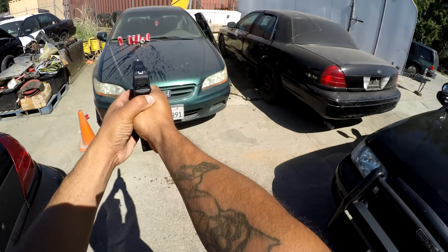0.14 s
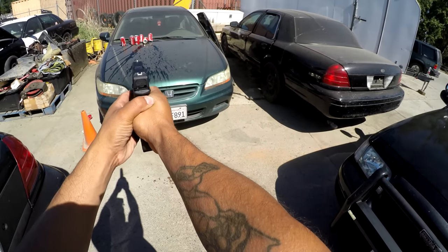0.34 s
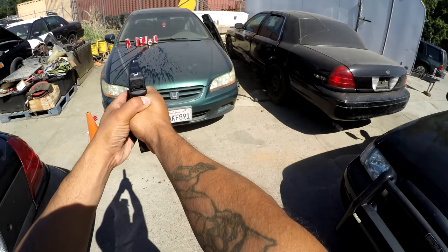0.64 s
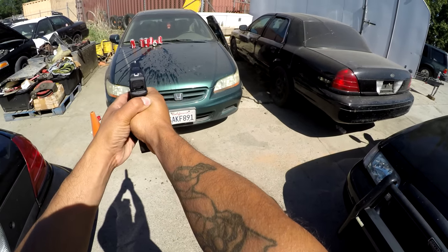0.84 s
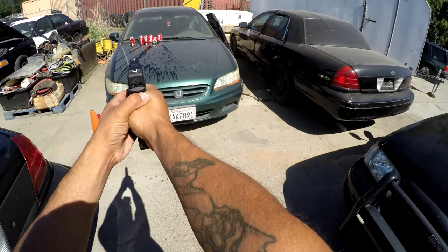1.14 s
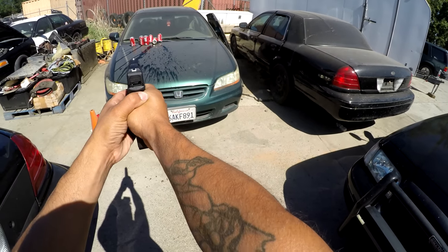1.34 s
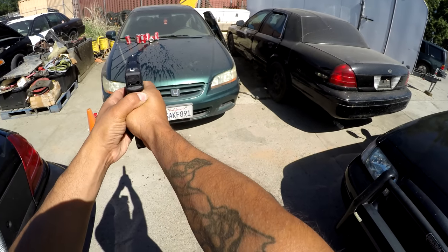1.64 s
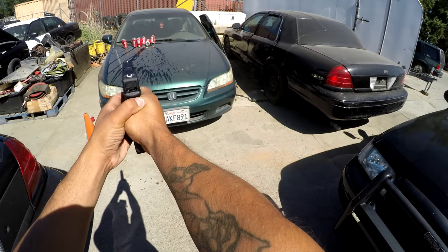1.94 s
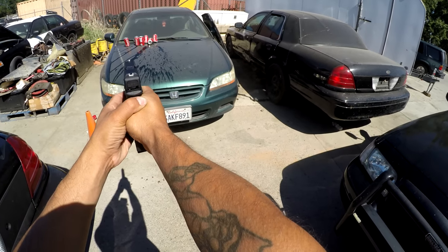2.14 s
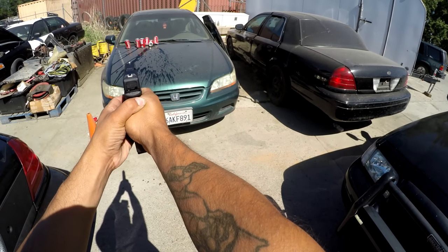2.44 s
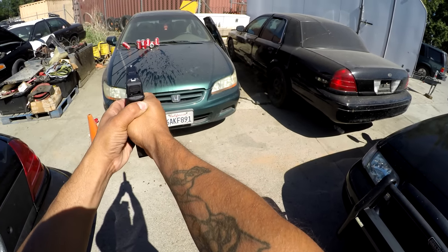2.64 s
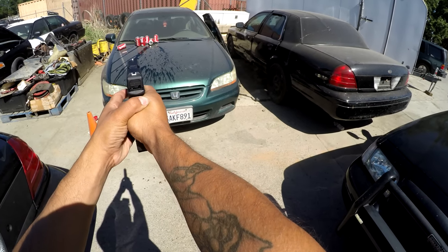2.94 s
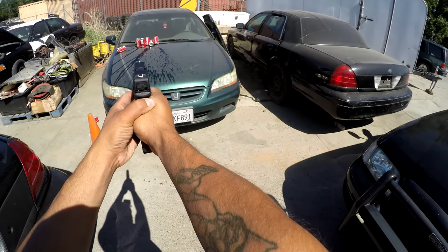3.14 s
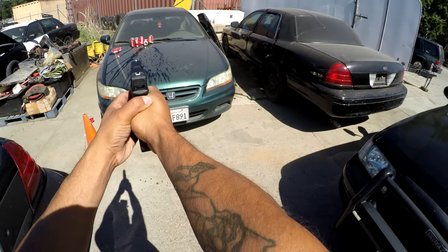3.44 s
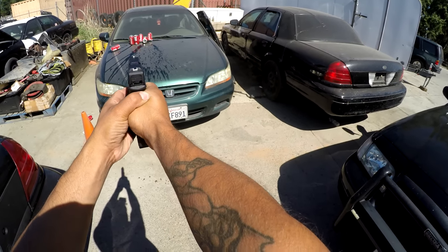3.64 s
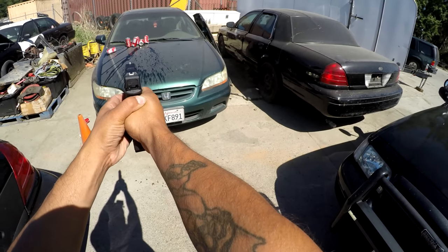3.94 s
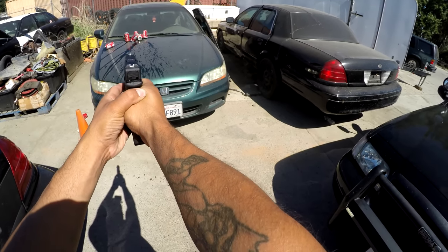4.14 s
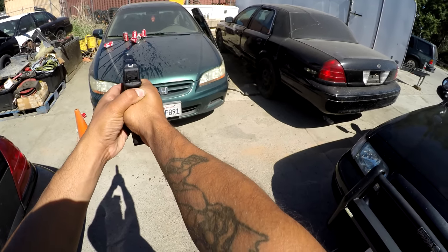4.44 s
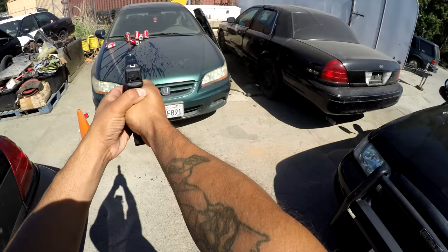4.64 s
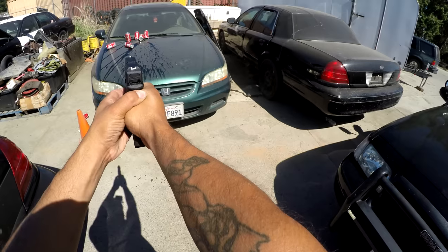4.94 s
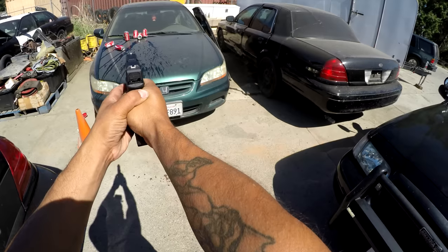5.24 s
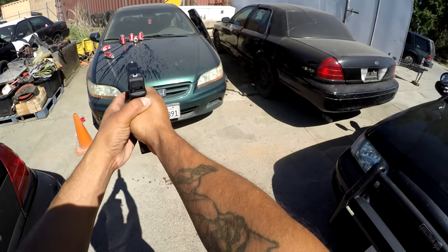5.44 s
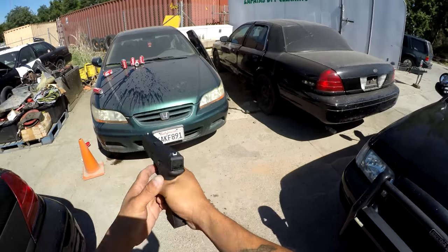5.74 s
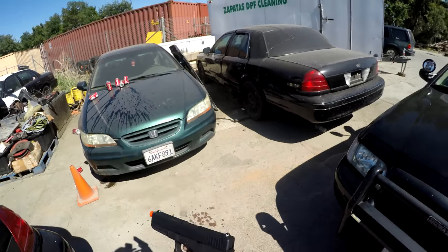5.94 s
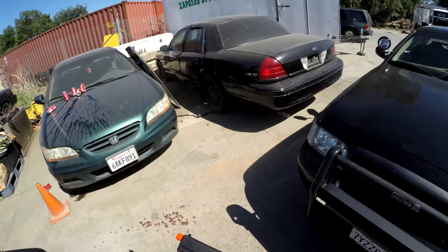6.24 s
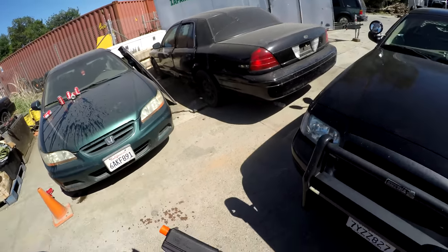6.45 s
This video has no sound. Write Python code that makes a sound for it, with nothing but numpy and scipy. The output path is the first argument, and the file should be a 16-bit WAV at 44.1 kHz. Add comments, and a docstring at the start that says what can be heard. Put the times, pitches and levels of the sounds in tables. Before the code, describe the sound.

A gas airsoft pistol fires four single shots about a second apart in an outdoor yard. Each is a sharp metallic clack and puff that overloads the close microphone, followed at once by a pellet cracking against a drink can. Struck cans tick and thud across a car hood, and at the end two clatter onto concrete. Faint wind and distant traffic sit underneath.

```python
"""Airsoft pistol and drink cans

A gas blowback pistol fires four times at cans on a car's hood in a concrete yard. Each shot is a quick
run of metal blows and two puffs of gas that overload the close microphone; the pellet lands a moment
later. Struck cans tumble over the hood and two drop to the ground. Gain control ducks the wind and
distant traffic after every shot."""
import sys
import numpy as np
from scipy import signal
from scipy.fft import rfft, irfft
from scipy.io import wavfile

SR = 44100
rng = np.random.default_rng(int(sys.argv[2]) if len(sys.argv) > 2 else 0)


def bounce(signal):
    """Save signal as a 16-bit WAV file at the path given by the first command-line argument."""
    frames = np.transpose(np.atleast_2d(signal))
    limited = np.clip(frames, -1, 1)
    pcm = np.round(limited * 32767).astype(np.int16)
    wavfile.write(sys.argv[1], SR, pcm)


N = 290178
TIME = np.arange(N) / SR


def from_db(db):
    """Decibels to gain."""
    return 10 ** (np.asarray(db) / 20)


def rms_one(x):
    """Scale to unit rms."""
    return x / np.sqrt(np.mean(x ** 2) + 1e-20)


def at_hz(points, hz, column=1):
    """Read a table's column on a log-frequency axis."""
    points = np.array(points)
    return np.interp(np.log(hz + 1e-9), np.log(points[:, 0]), points[:, column])


def butter(x, hz, kind, order=2):
    """Causal Butterworth filter."""
    return signal.sosfilt(signal.butter(order, hz, kind, fs=SR, output="sos"), x + 1e-18)


def lagged(x, seconds):
    """One-pole smoothing with a given time constant."""
    keep = np.exp(-1 / (seconds * SR))
    return signal.lfilter([1 - keep], [1, -keep], x + 1e-18)


def noise(spectrum):
    """Steady noise of a given colour, rms 1."""
    colour = from_db(at_hz(spectrum, np.fft.rfftfreq(N, 1 / SR)))
    return rms_one(irfft(rfft(rng.standard_normal(N)) * colour, N))


def wander(hz):
    """Random drift slower than the given rate, rms 1."""
    return rms_one(butter(rng.standard_normal(N), hz, "low"))


def humps(rows):
    """Bell-shaped rises of level (s, half-length s, dB), summed in dB."""
    return sum(db * np.exp(-((TIME - s) / half) ** 2) for s, half, db in rows)


def clicks(rows):
    """Single clean impacts (s, dB)."""
    out = np.zeros(N)
    for s, db in rows:
        out[int(s * SR)] += from_db(db)
    return out


def bursts(rows):
    """Chattering contacts (s, dB, t60 s): noise that starts at once and dies away."""
    power = np.zeros(N)
    for s, db, t60 in rows:
        at = max(int(s * SR), 0)
        age = TIME[:min(N - at, SR // 2)]
        power[at:at + len(age)] += from_db(db) ** 2 * np.exp(-2 * np.log(1000) * age / t60)
    return np.sqrt(power) * rng.choice([-1, 1], N)


def body(x, resonances):
    """Parallel resonances (Hz, width Hz, dB) of alternating sign that keep the power of white noise."""
    click, response = signal.unit_impulse(SR // 4), 0
    for k, (hz, width_hz, db) in enumerate(resonances):
        r = np.exp(-np.pi * width_hz / SR)
        poles = [1, -2 * r * np.cos(2 * np.pi * hz / SR), r * r]
        mode = signal.lfilter([1, 0, -1], poles, click + 1e-18)
        response = response + (-1) ** k * from_db(db) * (1 - r * r) * mode
    return signal.oaconvolve(x, response / np.linalg.norm(response))[:N]


# The colours of far engines and of tyres. Each row: frequency in Hz, relative level in dB.
ENGINE_SPECTRUM = [(30, -16.5), (62, 2.5), (85, -7.5), (125, 4.5), (175, -9), (225, -6.5), (300, -18),
                   (600, -21.5), (2000, -54.5)]
TYRE_SPECTRUM = [(100, -7), (370, 2.5), (700, -1.5), (1100, -8), (2000, -15), (4000, -21.5), (8000, -32.5),
                 (15000, -38)]
# Swells in the drone. Each row: peak time in seconds, half-length in seconds, rise in dB.
TRAFFIC_SWELLS = [(.85, .35, 3.5), (3.75, .2, 6), (4.8, .3, 4.5), (6.1, .45, 5)]


def traffic(drone_db=-43.5, hiss_db=-53.5):
    """Far traffic: a low drone that swells and fades under steady tyre hiss."""
    drone = from_db(drone_db + humps(TRAFFIC_SWELLS)) * noise(ENGINE_SPECTRUM)
    return drone + from_db(hiss_db) * noise(TYRE_SPECTRUM)


# The colour of the wind rumble. Each row: frequency in Hz, relative level in dB.
WIND_SPECTRUM = [(10, -22.5), (28, 4), (55, 3.5), (90, -12.5), (200, -25), (800, -71)]
# Gusts. Each row: peak time in seconds, half-length in seconds, rise in dB.
WIND_GUSTS = [(1.35, .35, 6), (2.45, .1, 6), (3.3, .2, 8), (3.7, 0.24, 11.5), (6.55, 0.27, 1.5)]


def wind(level_db=-44, eddy_db=3.0, eddy_hz=13.0):
    """Wind buffets the microphone in gusts, made lumpy by eddies."""
    eddies = eddy_db * wander(eddy_hz)
    return from_db(level_db + humps(WIND_GUSTS) + eddies) * noise(WIND_SPECTRUM)


# The yard's reverb. Each row: frequency in Hz, level in dB, t60 in seconds.
YARD_REVERB = [(100, -1.5, 0.47), (400, 2, 0.29), (1100, -8.5, 0.94), (3000, -0.5, 0.45),
               (6000, -6.5, 0.44), (14000, -16, .56)]


def yard(x, build_s=.009, uneven_db=2.1, uneven_hz=160.0):
    """Scatter from cars and walls: each band builds up, then dies in uneven clusters of echoes."""
    edges = np.geomspace(60, 16000, 10)
    white, out = rng.standard_normal((2, N)), 0
    for k, (low, high) in enumerate(zip(edges, edges[1:])):
        hz = np.sqrt(low * high)
        t60 = at_hz(YARD_REVERB, hz, column=2)
        power = lagged(butter(x, [low, high], "band") ** 2, build_s)
        power = lagged(power, t60 / (2 * np.log(1000)))
        wash = rms_one(butter(white[k % 2], [low, high], "band"))
        out = out + from_db(at_hz(YARD_REVERB, hz)) * np.sqrt(power) * wash
    return out * from_db(uneven_db * wander(uneven_hz))


# Cans hitting concrete. Each row: start in seconds, ring level in dB, knock level in dB,
# how early the rim touches in seconds, brightness of the ring in dB per octave.
CAN_DROPS = [(6.1821, -43, -42, 0.00104, 2), (6.2146, -20.5, -4.5, .006, 2.5),
             (6.4851, -12.5, -1.5, 0.00153, -4)]


def landings(rim_ring_db=-9.0, rim_knock_db=-13.5, rebound_s=.0068, ring_loss_db=6.5,
             knock_loss_db=19.5, count=3):
    """A can touches rim first, lands on its base and rebounds: rows of (s, ring dB, knock dB, tilt)."""
    contacts = []
    for s, ring, knock, lead, tilt in CAN_DROPS:
        contacts.append((s - lead, ring + rim_ring_db, knock + rim_knock_db, tilt))
        for k in range(count):
            contacts.append((s + k * rebound_s, ring - k * ring_loss_db, knock - k * knock_loss_db, tilt))
    return contacts


# The ring of a can's shell. Each row: pitch in Hz, level in dB, t60 in seconds.
SHELL_MODES = [(438, -29, 0.79), (760, -28, 0.28), (1010, -9, 0.19), (1180, -13, 0.12), (1600, -18, 0.11),
               (1823, 4.5, 0.044), (2030, -8.5, 0.22), (2966, -20.5, .13), (3265, -13, 0.22),
               (3240, -9, 0.091), (3350, -7.5, 0.18), (3414, -4, 0.12), (3506, 1, 0.067), (4170, -29, 0.13),
               (5100, -10, 0.05), (5370, -13, 0.079), (6400, -8, 0.031), (7000, -10, 0.035)]
# The knock of a can's base buckling. Each row: centre in Hz, width in Hz, level in dB.
BASE_KNOCK = [(356, 130, -1.5), (770, 200, 2.5), (1150, 330, 3), (1497, 310, 6.5), (1930, 240, 5.5)]


def falling_cans(shell_db=-6.5, scrape_db=-5.0, scrape_t60=0.097, knock_db=14.5,
                 rumble_db=-10.0, rumble_t60=0.19, pivot_hz=2000, uneven_db=3.4):
    """A hollow knock, a gritty scrape, a skidding rumble, and a shell that rings anew at each contact."""
    contacts = landings()
    ring, age = np.zeros(N + SR), TIME[:SR // 2]
    hz, mode_db, t60 = np.array(SHELL_MODES).T[:, :, None]
    modes = from_db(mode_db) * np.exp(-np.log(1000) * age / t60) * np.sin(2 * np.pi * hz * age)
    octaves = np.log2(hz[:, 0] / pivot_hz)
    for s, db, _, tilt in contacts:
        strengths = from_db(db + shell_db + tilt * octaves + rng.normal(0, uneven_db, len(modes)))
        strengths *= rng.choice([-1, 1], len(modes))
        at = int(s * SR)
        ring[at:at + len(age)] += strengths @ modes
    scrape = body(bursts([(s, db + scrape_db, scrape_t60) for s, db, *_ in contacts]), WALL_CRACK)
    rumble = bursts([(s, db + rumble_db, rumble_t60) for s, db, *_ in contacts])
    knock = body(clicks([(s, db + knock_db) for s, _, db, _ in contacts]) + rumble, BASE_KNOCK)
    return ring[:N] + butter(scrape, 5400, "low", order=1) + butter(knock, 1880, "low")


# A can's thin rim and the sheet-metal hood. Each row: centre in Hz, width in Hz, level in dB.
RIM_TICK = [(2180, 360, 0), (3110, 230, 2.5), (3860, 790, 0.5), (5650, 5400, -9), (11700, 6900, -18)]
HOOD_DRUM = [(218, 110, -1), (383, 41, 3.5), (460, 34, 1), (620, 140, -9.5), (800, 74, -5.5),
             (1180, 220, -10), (1530, 180, -21)]
# Runs of contacts on the hood; gaps shrink when a can bounces and hold when it rolls.
# Each row: start in seconds, number of contacts, first gap in seconds, ratio of each gap to the last,
# loss per contact in dB, tick level in dB, thud level in dB, ring pitch in Hz, ring level in dB.
HOOD_TUMBLES = [(1.572, 2, .07, 1, 13, -58, -56, 1224, -41.5),
                (1.610, 5, 0.18, 0.61, 8, -33, -56, 5050, -44),
                (2.761, 4, .063, .98, 9, -32, -23, 1230, -38.5),
                (2.991, 2, 0.056, 1, -0.5, -47.5, -57, 2320, -55),
                (3.109, 3, .067, 1.04, 3.5, -42.5, -46, 3270, -53.5),
                (3.310, 2, 0.036, 1, 1, -51, -39, 1324, -56),
                (4.245, 2, 0.059, 1, 13, -35.5, -22.5, 2150, -43.5),
                (4.352, 2, .038, 1, 10.5, -41, -25.5, 2060, -45.5),
                (4.625, 2, 0.032, 1, -3.5, -50.5, -48, 2110, -67),
                (5.487, 3, 0.098, .55, 7.5, -50.5, -30.5, 2047, -49.5),
                (5.787, 2, .046, 1, 0.5, -56, -50, 3250, -64)]


def tumbling_cans(tick_db=-2.5, thud_db=-4.5, knock_db=13.0, ring_db=-1.5, tick_t60=0.087,
                  thud_t60=0.29, ring_cycles=900.0, ring_width_hz=80.0, uneven_db=0.5):
    """At each contact a can knocks, ticks with its rim, drums the hood and rings at its run's pitch."""
    ticks, thuds, rings = [], [], 0
    for s, count, gap, ratio, loss_db, tick, thud, hz, ring in HOOD_TUMBLES:
        contacts = []
        for k in range(count):
            contacts.append((s, rng.normal(0, uneven_db) - k * loss_db))
            s += gap * ratio ** k
        ticks += [(at, db + tick + tick_db, tick_t60) for at, db in contacts]
        thuds += [(at, db + thud + thud_db, thud_t60) for at, db in contacts]
        shiver = bursts([(at, db + ring + ring_db, ring_cycles / hz) for at, db in contacts])
        rings = rings + body(shiver, [(hz, ring_width_hz, 0)])
    knocks = body(clicks([(at, db + knock_db) for at, db, _ in thuds]), BASE_KNOCK)
    rims = body(bursts(ticks), RIM_TICK)
    hood = body(bursts(thuds), HOOD_DRUM)
    return rims + butter(hood + knocks, 2600, "low") + rings


# A can wall's bright crack and hollow dent. Each row: centre in Hz, width in Hz, level in dB.
WALL_CRACK = [(2240, 300, -2.5), (2900, 490, 3.5), (4200, 800, 1.5), (6300, 900, -1), (8300, 1500, -6.5),
              (13200, 4000, -13)]
WALL_DENT = [(320, 160, -3), (670, 150, -5.5), (910, 150, -5.5), (1260, 170, -1.5)]
# Pellets landing. Each row: start in seconds, crack level in dB, dent level in dB,
# pitch of the struck can in Hz, ring level in dB.
PELLET_HITS = [(1.3724, 4, 9, 1230, -45), (2.5292, -2.5, -14.5, 1230, -44), (3.7580, 2.5, -5.5, 2170, -45),
               (4.8551, -9.5, -31, 4700, -54.5)]


def pellets(crack_t60=0.032, dent_t60=0.02, pop_db=9.0, wall_db=-31.0, wall_t60=0.45,
            ring_t60=.8, ring_width_hz=40.0):
    """A pellet cracks on a can and leaves it ringing; a square hit pops a dent and shakes the wall."""
    crack = body(bursts([(s, db, crack_t60) for s, db, *_ in PELLET_HITS]), WALL_CRACK)
    dents = [(s, db) for s, _, db, *_ in PELLET_HITS]
    pops = clicks([(s, db + pop_db) for s, db in dents])
    dent = body(pops + bursts([(s, db, dent_t60) for s, db in dents]), WALL_DENT)
    shake = bursts([(s, db + wall_db, wall_t60) for s, db in dents])
    wall = body(shake, [(850, 50, -3), (1230, 45, 0.5)])
    ring = sum(body(bursts([(s, db, ring_t60)]), [(hz, ring_width_hz, 0)])
               for s, _, _, hz, db in PELLET_HITS)
    return crack + dent + wall + ring


# The click of the trigger linkage. Each row: centre in Hz, width in Hz, level in dB.
LINKAGE_CLICK = [(2100, 130, 11), (3030, 340, -0.5), (4470, 500, 3.5), (6500, 830, -8), (8650, 900, -9.5),
                 (13000, 700, -20.5)]
# One pull per shot. Each row: take-up time in seconds, its level in dB,
# reset delay after the shot in seconds, its level in dB.
TRIGGER_PULLS = [(1.306, -24.5, 0.15, -12), (2.2252, -26, 0.16, -14), (3.392, -26, .170, -13),
                 (4.533, -27, 0.16, -14)]


def trigger(level_db=-2.0, t60=0.0075, bounce_s=0.0018, bounce_db=-8.0):
    """The trigger clicks on take-up before a shot and on reset after it, each with a quick bounce."""
    take_ups = [(s, db) for s, db, *_ in TRIGGER_PULLS]
    resets = [(s + delay, db) for (s, _), (*_, delay, db) in zip(PISTOL_SHOTS, TRIGGER_PULLS)]
    bounces = [(s + bounce_s, db + bounce_db) for s, db in take_ups + resets]
    force = bursts([(s, db, t60) for s, db in take_ups + resets + bounces])
    return from_db(level_db) * butter(body(force, LINKAGE_CLICK), 1400, "high")


# The pistol's hollow grip. Each row: centre in Hz, width in Hz, level in dB.
GRIP_THUMP = [(245, 150, -3.5), (415.3, 130, -1.5), (590, 62, 2.5)]


def recoil(stop_s=.0137, stop_db=7.5, close_s=.0557):
    """The slide thumps the hollow grip at its rear stop and again as it closes."""
    stops = clicks([(s + stop_s, db + stop_db) for s, db in PISTOL_SHOTS])
    closings = clicks([(s + close_s, db) for s, db in PISTOL_SHOTS])
    return body(stops + closings, GRIP_THUMP)


# The clack of slide and frame. Each row: centre in Hz, width in Hz, level in dB.
FRAME_CLACK = [(970, 190, -0.5), (1180, 77, 1.5), (1343, 91, 1.5), (1640, 240, 2.5), (2120, 400, -0.5),
               (2900, 350, 1.5), (3900, 650, -2), (4850, 600, -5), (6400, 900, -9.5), (8400, 1600, -14),
               (12000, 4100, -16.5)]
# The blows within a shot: sear, hammer swing, hammer on valve, gas rush, muzzle crack, gas spill,
# slide at its rear stop, feed, slide closing. Each row: delay in seconds, level in dB, t60 in seconds.
BLOWBACK_CYCLE = [(.0002, -16.5, 0.033), (.0012, -8.5, .03), (.0027, 5.5, 0.008), (.0050, -5, .02),
                  (.0078, 9.5, .006), (.0100, -3.5, .005), (0.0124, 3.5, .02), (0.0494, -5.5, 0.038),
                  (.0557, -11.5, 0.021)]
# The four shots. Each row: start in seconds, level in dB.
PISTOL_SHOTS = [(1.334, 2.5), (2.490, -1.5), (3.7204, 0.5), (4.8142, -2)]


def action(alike=0.75, spring_db=-16.0, spring_t60=.1, rattle_db=-20.5, rattle_t60=0.082, grip_db=-13.5):
    """Nearly the same blows hit the frame each shot; the spring buzzes and the closed slide rattles."""
    repeated = signal.oaconvolve(clicks(PISTOL_SHOTS), bursts(BLOWBACK_CYCLE)[:SR // 4])[:N]
    varied = bursts([(s + delay, db + blow_db, t60)
                     for s, db in PISTOL_SHOTS for delay, blow_db, t60 in BLOWBACK_CYCLE])
    spring = bursts([(s + 0.019, db + spring_db, spring_t60) for s, db in PISTOL_SHOTS])
    rattle = bursts([(s + .058, db + rattle_db, rattle_t60) for s, db in PISTOL_SHOTS])
    force = np.sqrt(alike) * repeated + np.sqrt(1 - alike) * varied + spring + rattle
    clack = butter(body(force, FRAME_CLACK), 620, "high")
    return clack + from_db(grip_db) * body(force, GRIP_THUMP)


def puffs(delay_s, width_s):
    """One bell-shaped pressure pulse in every shot."""
    return sum(from_db(db) * np.exp(-np.minimum(((TIME - s - delay_s) / width_s) ** 2, 50))
               for s, db in PISTOL_SHOTS)


def gas(vent_db=4.0, blast_db=10.5, ground_db=-20.0, ground_delay_s=.0072):
    """The valve vents a slow puff; the muzzle blast pushes, pulls, then returns off the concrete."""
    vent = -from_db(vent_db) * puffs(delay_s=.0065, width_s=.0014)
    push = puffs(delay_s=.0099, width_s=.0006)
    pull = puffs(delay_s=.0111, width_s=.001)
    blast = from_db(blast_db) * (push - 0.95 * pull)
    slap = from_db(ground_db) * np.interp(TIME - ground_delay_s, TIME, blast)
    return vent + blast + slap


def scene():
    """The pistol is at arm's length; the tumbling and falling cans are farther off and a touch wetter."""
    pistol = action() + gas() + recoil() + trigger()
    cans = tumbling_cans() + falling_cans()
    hits = pellets()
    reverb = yard(from_db(-19.5) * (pistol + hits) + from_db(-18.5) * cans)
    return (pistol + hits + cans + reverb + wind() + traffic())[None]


def gain_control(x, threshold_db=-11.5, release_db_per_s=14.5, attack_s=0.02, start_cut_db=7.0):
    """Loud sound ducks the gain, too late for the shot itself; it starts low and always creeps back."""
    level_db = 10 * np.log10(lagged(x ** 2, 0.011))
    excess_db = np.maximum(level_db - threshold_db, 0)
    creep = release_db_per_s * TIME
    held_db = np.maximum.accumulate(np.maximum(excess_db + creep, start_cut_db), axis=-1)
    cut_db = held_db - creep
    return x * from_db(-start_cut_db - lagged(cut_db - start_cut_db, attack_s))


def record(dry):
    """Bass roll-off that swings back after each puff, gain control, overload and a steep top cut."""
    cutoff_hz = 15400
    trimmed = butter(butter(dry, 20, "high"), cutoff_hz, "low", order=6)
    levelled = gain_control(trimmed)
    overloaded = .92 * levelled / (1 + levelled ** 4) ** (1 / 4)
    return butter(overloaded, cutoff_hz, "low", order=20)


dry = scene()
out = record(dry)
bounce(out)
```